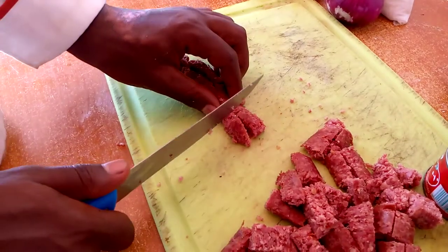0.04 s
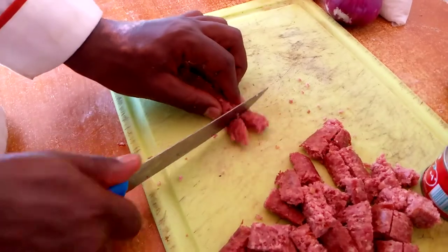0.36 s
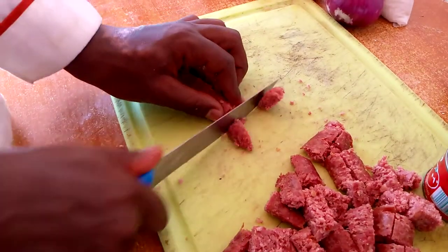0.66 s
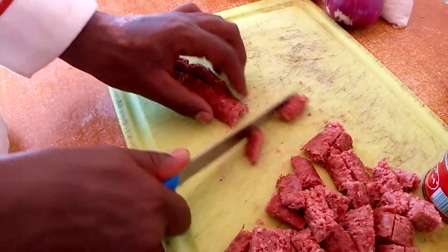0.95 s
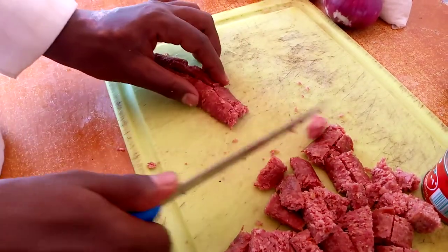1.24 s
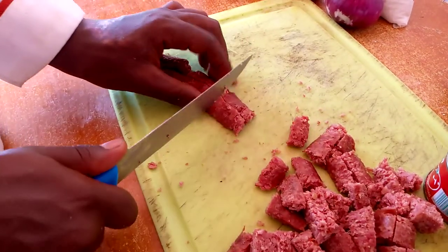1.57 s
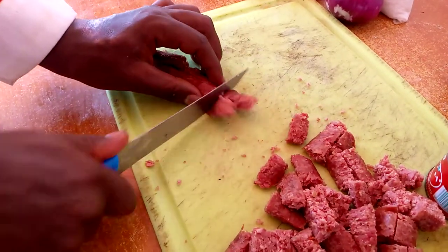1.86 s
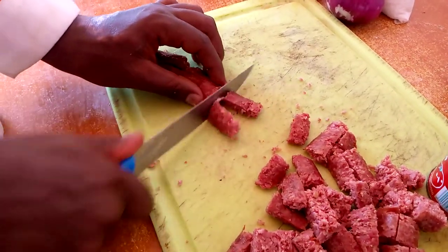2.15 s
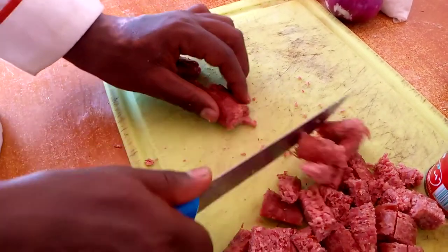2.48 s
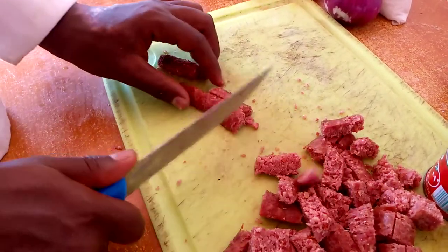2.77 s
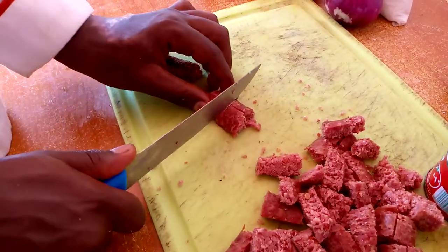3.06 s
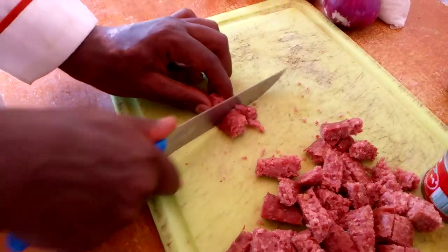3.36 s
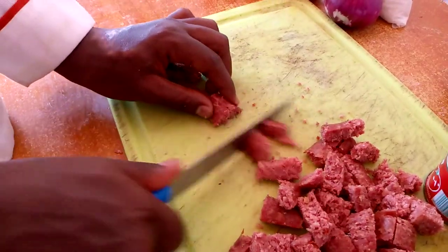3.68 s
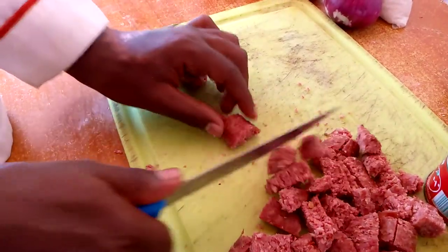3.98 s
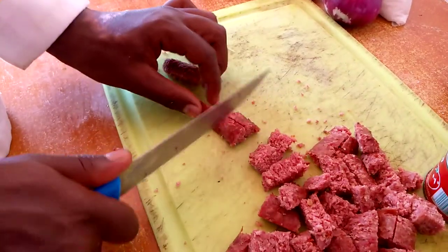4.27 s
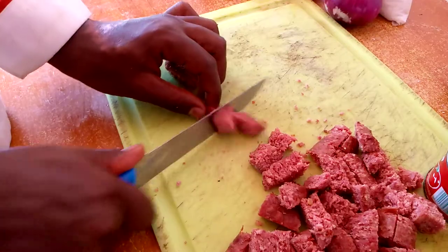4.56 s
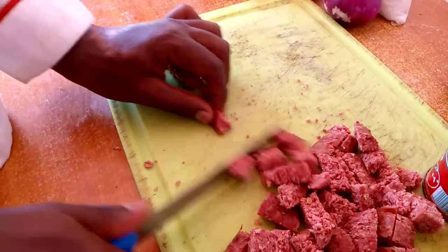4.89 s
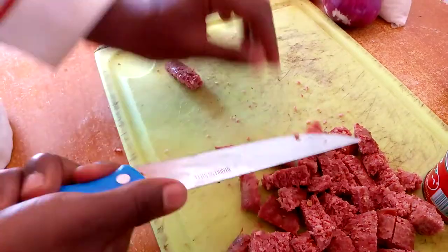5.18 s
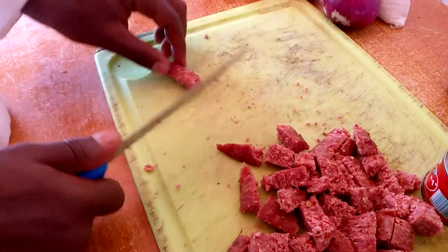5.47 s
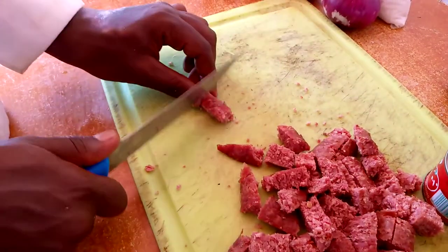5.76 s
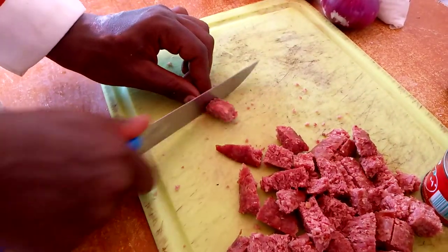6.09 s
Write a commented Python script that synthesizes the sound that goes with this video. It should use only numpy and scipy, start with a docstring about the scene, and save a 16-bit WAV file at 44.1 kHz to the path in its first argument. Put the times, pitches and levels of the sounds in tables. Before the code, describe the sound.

Soft rasping knife strokes through wet meat lead into brief crunchy clusters of knocks on a plastic cutting board. The cuts come unevenly, a second or so apart, lighter in the middle and firm again at the end. The cutting is close, with little echo. A small bird chirps faintly some way off, echoing a little in the kitchen, above a steady airy hiss and low hum.

```python
"""In a kitchen, close by, a knife saws through raw meat and crunches down onto a plastic cutting board.
Soft strokes rasp through the fibres and the wet meat squelches. Then the sinew gives in a run of snaps,
the edge knocks on the board, and the board thumps the counter. Some way off a small bird whistles
short rising peeps, over the airy noise of the room and a faint hum."""
import sys
import numpy as np
from scipy import signal
from scipy.fft import rfft, irfft
from scipy.io import wavfile
from scipy.ndimage import uniform_filter1d

SR = 44100
rng = np.random.default_rng(int(sys.argv[2]) if len(sys.argv) > 2 else 0)


def wav_record(signal):
    """Record a signal, one row per channel, as 16-bit PCM in the file named by sys.argv[1]."""
    frames = np.transpose(np.atleast_2d(signal))
    bounded = np.clip(frames, -1, 1)
    # unit amplitude maps onto the largest positive 16-bit level
    quanta = np.round(bounded * 32767).astype(np.int16)
    wavfile.write(sys.argv[1], SR, quanta)


N = 274743
TIME = np.arange(N) / SR

# Levels in the tables are relative. A ring_s or echo_s is the time a sound takes to fade by 60 dB.
# The edge breaks through and strikes the board: start_s, board_db, crunch_db
HARD_KNOCKS = [(.569, -46, -48), (0.8015, -32.5, -42), (0.818, -31.5, -36), (.849, -33.5, -55),
               (2.142, -33.5, -32.5), (2.15, -33, -39), (2.1644, -26, -26), (2.171, -27, -21),
               (2.189, -21.5, -45), (2.2155, -29, -28), (3.247, -36.5, -47), (3.402, -44, -65),
               (4.7175, -33.5, -39.5), (4.7455, -33, -33), (4.748, -24.5, -45), (4.783, -28, -37),
               (5.978, -71, -37.5), (6.173, -44, -38), (6.183, -52, -28.5), (6.190, -24, -29.5),
               (6.2148, -25.5, -30.5), (6.2205, -29, -27.5)]
# The blade bears down through sinew: start_s, length_s, board_db, crunch_db, thump_db, fade_db, spot_hz
SINEW_CUTS = [(0.807, .066, -32, -39.5, -47, 9.5, 673), (2.155, 0.059, -28, -30, -42, 2, 407),
              (3.252, 0.032, -45, -47, -56, 17, 275), (3.551, .07, -36, -47, -51, 7.5, 285),
              (4.739, 0.062, -30, -39.5, -47, 5.5, 485), (6.173, 0.047, -32, -48, -61.5, 10, 313)]
# The notes each thing rings with when struck: pitch_hz, level_db, ring_s
BOARD_NOTES = [(678.3, -28, 0.16), (738, -27, 0.13), (910, -30, 0.23), (967.6, -1.5, 0.03),
               (1050, -4.5, 0.019), (1063, -16.5, 0.042), (1182, -14, 0.037), (1429, -19, 0.078),
               (1799, -3.5, 0.013), (2056, -6, 0.017)]  # plastic under the edge
BLADE_NOTES = [(3170, -1.5, 0.033), (3570, 2, 0.04), (3920, 6, 0.05), (4160, -5.5, 0.018), (4650, -4, 0.04),
               (5690, -5.5, 0.012), (6400, -0.5, 0.01)]  # steel, muffled by meat and hand
COUNTER_NOTES = [(136, -18, 0.048), (272, -30.5, 0.032), (305, -9.5, 0.073), (387.6, -17.5, 0.085),
                 (457, -27.5, 0.034), (483, -25.5, 0.083)]  # the board on the counter
WET_FILM_NOTES = [(7430, 10, 0.0031), (9700, 4.5, 0.0042), (12500, 6, .0015)]  # a wet film pulling apart
# Soft swells of sound from the meat: middle_s, length_s, level_db
SAW_STROKES = [(.415, 0.16, -54.5), (.585, 0.19, -52.5), (.755, 0.17, -53), (1.855, 0.17, -52),
               (2.035, 0.2, -53), (3.27, 0.14, -59), (3.40, 0.15, -56.5), (4.535, 0.086, -55),
               (4.695, 0.22, -48.5), (5.985, 0.1, -53.5), (6.155, 0.19, -50)]  # the blade saws through it
WET_SQUELCHES = [(.35, 0.41, -67.5), (.57, 0.059, -68), (1.245, 0.081, -69.5), (1.785, 0.41, -65.5),
                 (3.21, 0.35, -68.5), (3.42, 0.19, -69), (4.49, 0.41, -72), (5.955, 0.17, -65)]  # it clings to steel and fingers
# Single wet ticks: start_s, level_db
WET_TICKS = [(0.2644, -55), (0.2883, -48), (0.3162, -48), (0.5557, -51), (1.7759, -51), (3.148, -58),
             (3.355, -55), (3.778, -55), (4.4037, -59), (5.8458, -57.5)]
# The bird's rising peeps: start_s, length_s, start_hz, top_hz, level_db, rasp (0 to 1)
BIRD_PEEPS = [(0, 0.018, 4200, 4440, -56.5, 1), (0.184, 0.077, 4680, 5500, -69.5, 0.3),
              (1.055, .1, 3620, 4670, -51, 0.73), (1.427, 0.082, 5050, 5500, -61, 0.7),
              (1.551, 0.125, 3700, 5310, -51, 1), (2.12, 0.042, 3960, 4880, -58, 1),
              (2.473, 0.087, 4960, 6270, -60.5, 0.53), (3.432, 0.15, 3980, 6070, -51, 0.8),
              (3.91, 0.094, 3975, 4970, -52.5, 0.86), (4.536, 0.062, 5190, 6150, -58.5, 0.6)]
# Tone colours, or how strong each sound is from bass to treble: pitch_hz, level_db
CRUNCH_TONE = [(200, -35), (550, -18), (1000, 5), (1600, -4.5), (2050, 3), (2800, -2), (3300, 1),
               (4200, 5.5), (5000, 1), (6200, -3.5), (7200, -3.5), (8500, -15), (15500, -13)]
SAWING_TONE = [(250, -10.5), (650, -11), (950, 9), (1500, 0), (2100, 6), (2800, 0), (3800, 2), (5000, -0.5),
               (6300, -5.5), (7500, -7.5), (15500, -27.5)]
WET_TONE = [(500, -41), (2000, -34), (5300, 1), (7000, 5), (8300, 1.5), (10200, 1.5), (13000, 2.5),
            (15500, 0.5)]
AIR_TONE = [(250, -31), (420, -8), (620, -10.5), (1000, 0.5), (1320, 2), (1700, -8), (2300, -8.5),
            (3100, -13), (3420, -12.5), (3640, -18), (3950, -13.5), (6300, -15), (9000, -22),
            (15500, -19.5)]
RUMBLE_TONE = [(20, -36), (36, 0), (48, -38), (62, -3.5), (78, -2.5), (110, -10.5), (140, 4.5), (200, -8.5),
               (290, -4.5), (400, -23), (600, -39)]
MICROPHONE_TONE = [(20, -1.5), (6400, -1.5), (7400, -6.5), (8450, -8), (9000, -5), (9800, -8.5),
                   (10400, -13), (13400, -20.5), (15200, -12.5)]  # drooping treble with two small peaks
# The room noise rises and falls a little: time_s, level_db
AIR_LEVELS = [(0, 0.5), (1.3, 1.5), (2.9, 0.5), (4.3, 1), (5.3, -1), (6.2, 1)]
# The three notes of the hum: pitch_hz, trim_db
HUM_NOTES = [(51, 0.5), (76, 4), (103.5, 1)]
# How strong those notes are over time: time_s, low_db, middle_db, high_db
HUM_LEVELS = [(0.0, -81, -102, -81), (0.1, -67, -74, -76), (0.17, -70, -84, -68.5), (0.68, -64, -81, -78),
              (1.28, -82, -79, -72), (2.85, -65.5, -81, -65), (3.04, -69.5, -71, -69.5),
              (3.71, -64.5, -79, -68), (4.56, -75, -84, -78), (4.68, -77, -84, -69), (5.88, -81, -70, -77),
              (6.23, -77, -80, -65)]
# How long the kitchen echoes: pitch_hz, echo_s
ECHO_TIMES = [(100, 0.49), (300, 0.78), (1000, 0.48), (4000, 0.58), (7000, 0.48), (15000, 0.54)]


def knife(board_db=2, crunch_db=-1, blade_db=-38, give_s=0.00034, spread_s=0.0087):
    """Fibres snap in short bursts that shake the blade; the edge hits the board, which rings."""
    knock_decay_s, slip_decay_s = 0.0038, 0.006
    hits = [(s, ring_db, snap_db, knock_decay_s) for s, ring_db, snap_db in HARD_KNOCKS]
    for start, length, ring_db, snap_db, _, fade_db, _ in SINEW_CUTS:
        slips = jerks(start, length, fade_db, per_s=126)  # the edge sticks and slips
        hits += [(s, ring_db + db, snap_db + db, slip_decay_s) for s, db in slips]
    t = TIME[:SR // 8]
    tearing = np.zeros(N)
    for s, _, db, decay_s in hits:
        burst = gain(db) * np.exp(-t / decay_s) * (1 - np.exp(-t / give_s))
        add(tearing, s, burst ** 2)
    # small fibres keep parting around each snap
    tearing += 0.27 * abs(uniform_filter1d(tearing, int(spread_s * SR)))
    snaps = np.sqrt(tearing) * crackle(per_s=20000, spread_db=2.5)
    crunch = gain(crunch_db) * colour(snaps, CRUNCH_TONE)
    blade = gain(blade_db) * ring(snaps, BLADE_NOTES, rise_s=0.00027)
    board = gain(board_db) * ring(taps(hits), BOARD_NOTES, rise_s=0.001)
    return crunch + blade + board


def board_thumps(first_touch_db=-10.5, press_s=0.025, spot_db=-4, spot_ring_s=0.091, muffle_s=0.076):
    """As weight comes on, the board rocks against the counter and the struck spot adds its own note."""
    out = np.zeros(N)
    for start, length, _, _, thump_db, fade_db, spot_hz in SINEW_CUTS:
        bumps = jerks(start, length, fade_db, per_s=52)
        force = taps([(s, db + np.interp(s - start, [0, press_s], [first_touch_db, 0]))
                      for s, db in bumps])
        counter = normalise(ring(force, COUNTER_NOTES, rise_s=0.0033))
        spot = gain(spot_db) * normalise(ring(force, [(spot_hz, 0, spot_ring_s)], rise_s=0.00084))
        # once through the meat, the resting blade muffles the board
        muffling = np.exp(-np.maximum(TIME - start - length, 0) / muffle_s)
        out += gain(thump_db) * normalise((counter + spot) * muffling) * np.sqrt(length * SR / N)
    return out


def meat(catch_db=1.3, drag_db=-38, wet_db=8, tick_db=3, cling_s=0.12, cling_db=-26.5):
    """The edge rasps through fibres, shaking blade and board; wet surfaces part with small ticks."""
    catching = gain(catch_db * wander(90))
    sawing = swells(SAW_STROKES) * catching * crackle(per_s=7000, spread_db=3.5)
    rasp = colour(sawing, SAWING_TONE)
    drag = gain(drag_db) * ring(sawing, BLADE_NOTES + BOARD_NOTES, rise_s=0.00017)
    # each cut squelches too, more softly than it crunches
    clings = [(start + length / 2, cling_s, crunch_db + cling_db)
              for start, length, _, crunch_db, *_ in SINEW_CUTS]
    sticking = swells(WET_SQUELCHES + clings) * crackle(per_s=1000, spread_db=4.5)
    squelch = gain(wet_db) * colour(sticking, WET_TONE)
    ticks = gain(tick_db) * ring(taps(WET_TICKS), WET_FILM_NOTES, rise_s=0.0001)
    return rasp + drag + squelch + ticks


def bird(glide_hz_per_s=28000, trill_hz=260, octave_db=-7, flutter_db=3):
    """A whistle slides up and levels off; a fast, uneven wobble in pitch makes it rasp."""
    out = np.zeros(N)
    wobble = np.sin(phase_of(trill_hz * (1 + 0.2 * wander(60.3))))
    trill = 0.09 * wobble + 0.044 * wander(1000)
    for s, length, start_hz, top_hz, db, rasp in BIRD_PEEPS:
        progress = np.linspace(0, 1, int(length * SR))
        span_hz = top_hz - start_hz
        climb_hz = span_hz * np.tanh(glide_hz_per_s * progress * length / (span_hz + 1e-6))
        hz = (start_hz + climb_hz) * (1 + rasp * trill[int(s * SR):][:len(progress)])
        phase = phase_of(hz)
        loudness = gain(db) * np.sqrt(abs(np.sin(np.pi * progress ** 1.1)))
        octave = rasp * gain(octave_db) / (1 + (hz / 5100) ** 20)  # only lower notes have an overtone
        add(out, s, loudness * (np.sin(phase) + octave * np.sin(2 * phase)))
    return out * normalise(gain(flutter_db * wander(300)))


def kitchen_echo(sound, delay_s=0.0029):
    """Sound bounces around the room many times, each pitch dying away at its own speed."""
    bounces = rng.standard_normal(SR) * (rng.random(SR) < 0.15) * (TIME[:SR] > delay_s)
    hz, t, bands = signal.stft(bounces, SR, nperseg=256)
    fading = np.exp(-np.log(1000) * t / look_up(ECHO_TIMES, hz)[:, None])
    tail = signal.istft(bands * fading, SR, nperseg=256)[1]
    return pass_through(sound, tail)


def room_noise(air_db=-61.5, rumble_db=-66, wall_gain=0.38, wall_decay_s=0.021):
    """Airy noise, coloured by bouncing off the walls, lies over a lumpy low rumble."""
    air_level = gain(air_db + np.interp(TIME, *np.transpose(AIR_LEVELS)))
    air = air_level * colour(rng.standard_normal(N), AIR_TONE)
    t = TIME[:SR // 8]
    walls = rng.standard_normal(len(t)) * np.exp(-t / wall_decay_s)
    air = (air + wall_gain * pass_through(air, walls)) / np.hypot(1, wall_gain)
    rumble = gain(rumble_db + 2.36 * wander(10)) * colour(rng.standard_normal(N), RUMBLE_TONE)
    return air + rumble


def hum(pitch_drift=0.0258):
    """Three faint low notes waver in loudness and pitch."""
    out = np.zeros(N)
    times, *levels = np.transpose(HUM_LEVELS)
    for (hz, trim_db), level_db in zip(HUM_NOTES, levels):
        note = np.sqrt(2) * np.sin(phase_of(hz * (1 + pitch_drift * wander(4.3))))
        out += gain(trim_db + np.interp(TIME, times, level_db)) * note
    return out


def jerks(start, length, fade_db, per_s, jitter=0.293, spread_db=2.5):
    """An uneven run of jerks that weakens through a cut, as rows of time_s, level_db."""
    progress = np.linspace(0, 1, max(round(length * per_s), 1) + 1)
    lateness, strength = rng.uniform(-1.105, 1, (64, 2))[:len(progress)].T
    times = start + length * progress + (progress > 0) * jitter * lateness / per_s
    return np.transpose([times, spread_db * strength - fade_db * progress])


def taps(rows):
    """One instant push for each row of start_s, level_db."""
    force = np.zeros(N)
    for s, db, *_ in rows:
        add(force, s, gain([db]))
    return force


def ring(force, notes, rise_s):
    """A push sets an object's notes ringing; they build up quickly, then die away."""
    t = TIME[:SR // 2]
    body = sum(gain(db - 60 * t / ring_s) * np.sin(2 * np.pi * hz * t) for hz, db, ring_s in notes)
    return signal.oaconvolve(force, body * (1 - np.exp(-t / rise_s)))[:N]


def crackle(per_s, spread_db):
    """Tiny clicks of uneven size at random moments."""
    size = gain(spread_db * np.minimum(rng.exponential(1, N), 4))
    return normalise(size * rng.choice([-1, 1], N) * (rng.random(N) < per_s / SR))


def swells(rows):
    """One smooth rise and fall for each row of middle_s, length_s, level_db."""
    return sum(gain(db) * np.cos(np.pi * np.clip((TIME - middle) / length, -0.5, 0.5)) ** 2
               for middle, length, db in rows)


def wander(hz):
    """A smooth random wobble, with up to about hz swings a second."""
    spectrum = rfft(rng.standard_normal(N))
    return normalise(irfft(spectrum / (1 + (np.fft.rfftfreq(N, 1 / SR) / hz) ** 4), N))


def colour(sound, tone, size=8192):
    """Gives a sound the balance of bass and treble in a tone table."""
    log_gain = np.log(gain(look_up(tone, abs(np.fft.fftfreq(size, 1 / SR)))))
    # built so that nothing rings before the sound arrives
    response = np.fft.ifft(np.exp(np.conj(signal.hilbert(log_gain)))).real[:size // 2]
    return pass_through(sound, response)


def pass_through(sound, response):
    """Filters a sound, given the filter's response to one click (scaled to an energy of 1)."""
    return signal.oaconvolve(sound, response / np.linalg.norm(response))[:N]


def look_up(table, hz):
    """Reads between a table's rows, with pitch spaced by octaves."""
    pitches, values = np.transpose(table)
    return np.interp(np.log(hz + 1), np.log(pitches + 1), values)


def phase_of(hz):
    """How far a wave of changing pitch has turned, in radians."""
    return 2 * np.pi * np.cumsum(hz) / SR


def gain(db):
    """Turns decibels into a number to multiply by."""
    return 10 ** (np.asarray(db) / 20)


def normalise(sound):
    """Scales a sound to an average strength (rms) of 1."""
    return sound / np.sqrt(np.mean(sound ** 2) + 1e-20)


def add(mix, start_s, sound):
    """Mixes a sound in at the given time."""
    part = mix[max(round(start_s * SR), 0):][:len(sound)]
    part += sound[:len(part)]


def scene(cutting_echo_db=-9.5, bird_direct_db=-3, bird_echo_db=1):
    """The cutting is close and has little echo; the bird arrives mostly by way of the walls."""
    cutting = knife() + board_thumps() + meat()
    peeps = bird()
    near = cutting + gain(cutting_echo_db) * kitchen_echo(cutting)
    far = gain(bird_direct_db) * peeps + gain(bird_echo_db) * kitchen_echo(peeps)
    return (near + far + room_noise() + hum())[None]


def record(dry, gain_db=-5, cutoff_hz=15850):
    """The microphone softens the treble, and the very highest pitches are cut off."""
    heard = gain(gain_db) * colour(dry[0], MICROPHONE_TONE)
    low_pass = signal.firwin(511, cutoff_hz, window=("kaiser", 9), fs=SR)
    return signal.oaconvolve(heard, low_pass, "same")[None]


dry = scene()
out = record(dry)
wav_record(out)
```